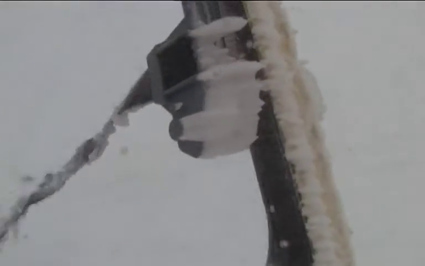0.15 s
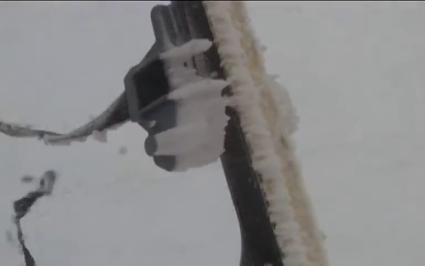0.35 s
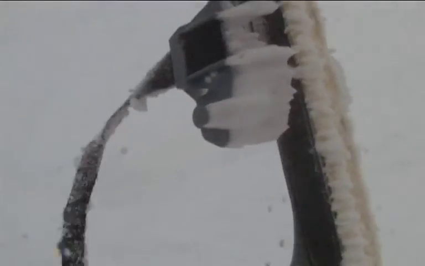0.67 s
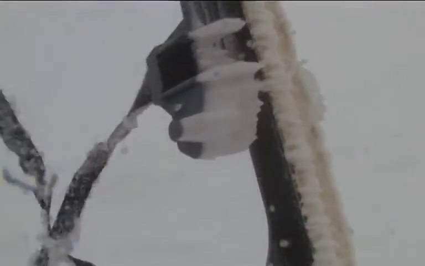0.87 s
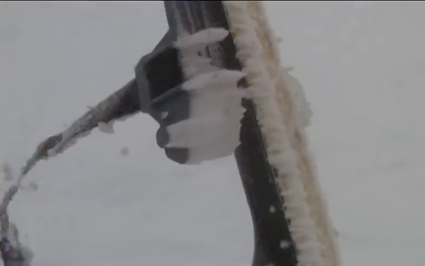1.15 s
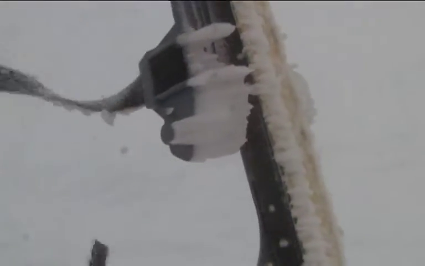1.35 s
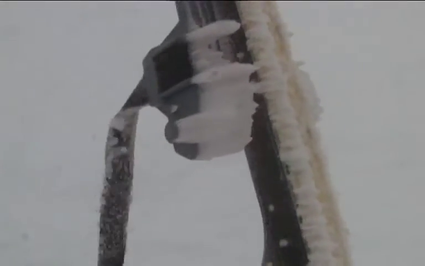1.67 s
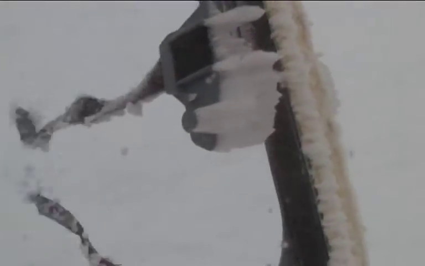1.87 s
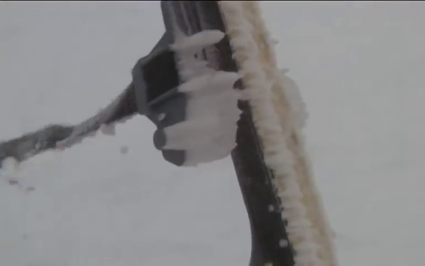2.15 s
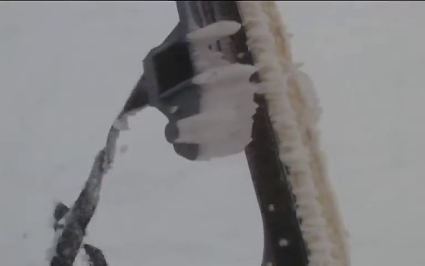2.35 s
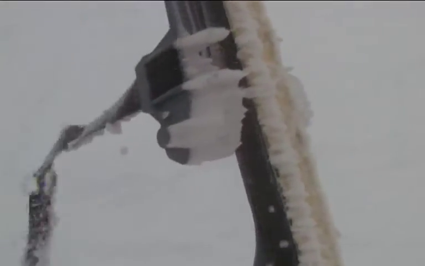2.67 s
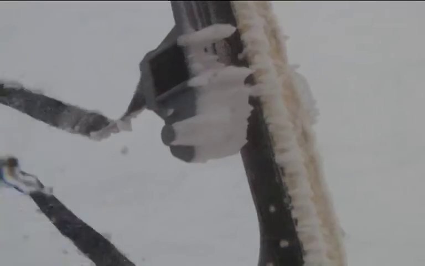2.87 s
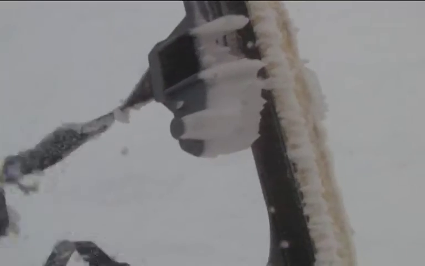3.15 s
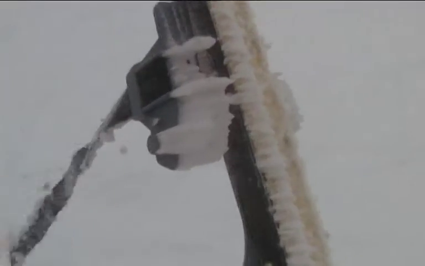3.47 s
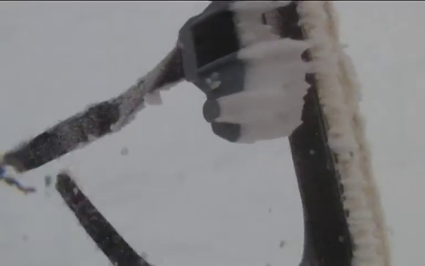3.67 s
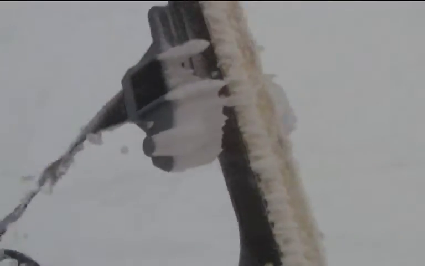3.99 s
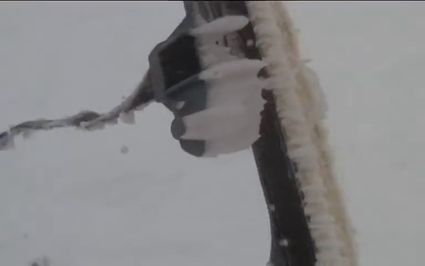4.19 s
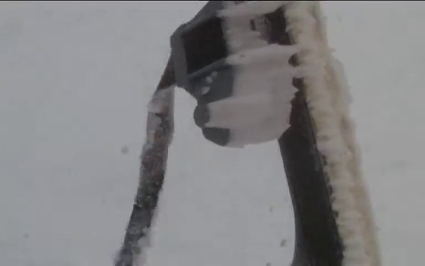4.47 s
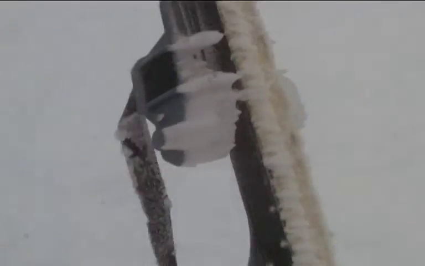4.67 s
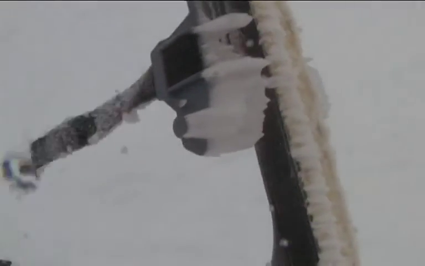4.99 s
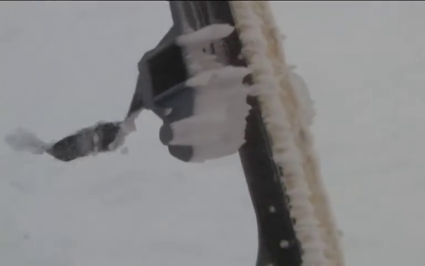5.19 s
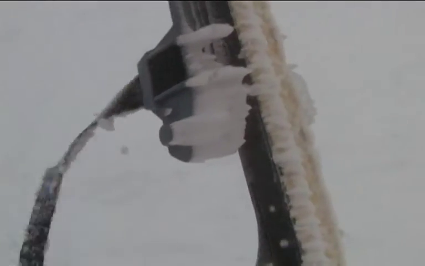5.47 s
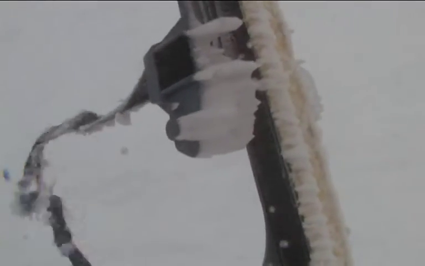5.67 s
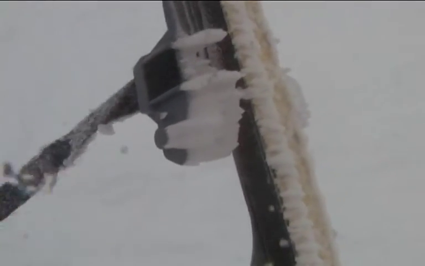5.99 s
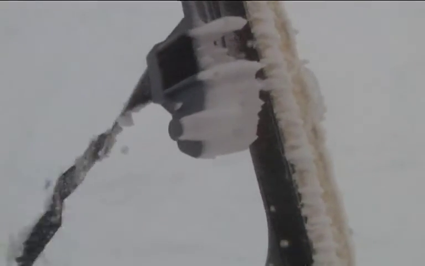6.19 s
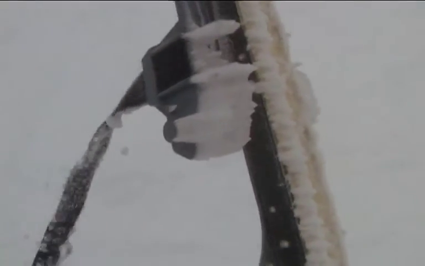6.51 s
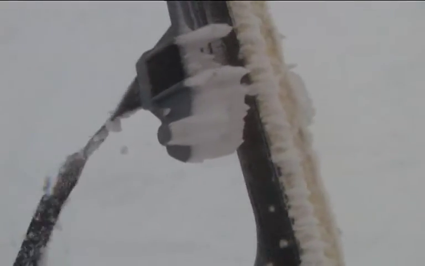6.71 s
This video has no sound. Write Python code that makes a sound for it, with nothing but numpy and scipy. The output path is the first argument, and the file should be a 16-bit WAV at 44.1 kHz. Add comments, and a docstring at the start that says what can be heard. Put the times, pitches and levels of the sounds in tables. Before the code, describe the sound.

Close, overloaded-sounding wind noise in open snowy air, with no echo. Deep buffeting and torn roaring continue throughout, broken by very short lulls and abrupt gusts. Fine snow hisses faintly, brightening with the gusts, and a thin airy high whistle barely shows. Small hard ice clicks cluster in the first second; later ones are sparse and nearly buried.

```python
"""A blizzard blows across a camera beside an iced-up mast, in deep rumble, ragged roar and hissing snow.
In the first second ice grains tick against the housing, and the level ducks briefly under the loudest tick.
Gusts and lulls move rumble, roar and snow (all shaped noise) together throughout; later ticks are few and faint.
A narrow gap sings all along as a thin band of noise, swelling early on and again past the third second.
The strongest gust lands shortly after the sixth second."""
import sys
import numpy as np
from scipy.fft import rfft, irfft, next_fast_len
from scipy.io import wavfile
from scipy.ndimage import uniform_filter1d, map_coordinates

SR = 44100
rng = np.random.default_rng(int(sys.argv[2]) if len(sys.argv) > 2 else 0)


def wrap_up_sound(samples):
    """Save the sound to the file named by the first command line argument, as 16-bit audio."""
    columns = np.atleast_2d(samples).T
    # keep every value between -1 and 1, then stretch to whole-number steps
    tamed = np.clip(columns, -1, 1)
    steps = np.round(tamed * 32767).astype(np.int16)
    wavfile.write(sys.argv[1], SR, steps)


N = 302085  # length in samples


def amp(db):
    """Decibels to gain."""
    return 10 ** (np.asarray(db) / 20)


def unit(x):
    """Scale to rms 1."""
    return x / np.sqrt(np.mean(x ** 2) + 1e-20)


def wobble(rate):
    """A smooth random curve through normal random knots, rate of them a second."""
    knots = rng.standard_normal(int(N * rate / SR) + 4)
    return map_coordinates(knots, [np.arange(N) * rate / SR])


def swells(table):
    """Sum of bell curves: each peaks at its level and is its length wide at half that level."""
    t = np.arange(N) / SR
    return sum(db * .5 ** ((2 * (t - middle) / length) ** 2) for middle, length, db in table)


def filtered(x, response):
    """Filter x by a gain given as a function of frequency."""
    m = next_fast_len(N + 8192)  # padded so the ends do not wrap round
    return irfft(rfft(x, m) * response(np.fft.rfftfreq(m, 1 / SR)), m)[:N]


def treble(x, corner_hz):
    """The part of x above a smooth corner, where the gain is one half."""
    return filtered(x, lambda hz: hz ** 4 / (hz ** 4 + corner_hz ** 4))


def coloured(x, spectrum):
    """Shape x by spectrum points joined on a log frequency axis, at rms 1."""
    f, db = np.transpose(spectrum)
    return unit(filtered(x, lambda hz: amp(np.interp(np.log(hz + 1), np.log(f), db))))


def turbulence(swirl_db):
    """White noise whose strength follows the swirling air."""
    return amp(swirl_db) * rng.standard_normal(N)


WHISTLE_DB = -58  # rms level between swells
# moments when the wind meets the gap squarely: middle t/s, length t/s, swell level/dB
WHISTLE_SWELLS = [(.17, .04, 7), (3.395, .08, 16), (3.834, .015, 13), (5.03, .04, 10)]


def whistle(centre_hz=5300, width_hz=360):
    """Air crossing a narrow gap sings as a faint band of noise; now and then it swells."""
    band = filtered(rng.standard_normal(N), lambda hz: np.exp(-.5 * ((hz - centre_hz) / width_hz) ** 2))
    return amp(WHISTLE_DB + swells(WHISTLE_SWELLS)) * unit(band)


HISS_DB, HISS_GROWTH = -42, 0.48  # level at zero drift; dB of hiss per dB of drift
SNOW_INERTIA_S = 0.035  # time over which the snow evens out the drive
# spectrum of the streaming snow: f/Hz, level/dB
SNOW_SPECTRUM = [(500, -24), (2000, 3.5), (3000, 0.5), (3850, 2.5), (4850, -5), (5900, -5.5), (7200, -2.5),
                 (8500, -6.5), (9300, -8.5), (10600, -8.5), (11700, -14), (12500, -14.5), (13700, -17.5),
                 (15800, -21)]
# spectrum of a coarse grain's tiny tick: f/Hz, level/dB
GRAIN_SPECTRUM = [(3000, -30), (6500, -9), (8500, 11), (11000, -6), (13500, -5), (15800, -10)]
# thicker puffs of snow: middle t/s, length t/s, extra drift level/dB
FLURRIES = [(.3, 0.32, 2), (3.388, 0.019, 5), (3.428, .018, 3.5), (4.17, 0.035, 5), (6.285, .02, 1)]


def snow(drive_db, flutter, eddies, grains_per_s=55, grain_db=-18.0,
         fizz_hz=7500, fizz_growth=0.45, fizz_flutter_db=2.5):
    """Fine snow, too heavy to follow the briefest changes, hisses and fizzes brighter in gusts, amid coarser grains."""
    drift_db = uniform_filter1d(drive_db, int(SNOW_INERTIA_S * SR)) + swells(FLURRIES)
    hiss = coloured(turbulence(0.88 * flutter + 1.18 * eddies), SNOW_SPECTRUM)
    fizz = treble(hiss, fizz_hz)
    sparkle = unit(amp(fizz_growth * drift_db + fizz_flutter_db * wobble(220)))
    stream = hiss - fizz + fizz * sparkle
    # grains arrive at random and at a steady average rate, each with its own strength
    impacts = (rng.random(N) < grains_per_s / SR) * rng.standard_normal(N)
    grains = coloured(impacts, GRAIN_SPECTRUM)
    return amp(HISS_DB + HISS_GROWTH * drift_db) * stream + amp(HISS_DB + grain_db) * grains


# the housing's ringing modes: f/Hz, level/dB, time to fall 60 dB t/s
HOUSING_MODES = [(2000, -3.5, .0064), (2740, -7.4, .0037), (3580, -1.1, .0033), (4080, -4.8, .0045),
                 (6430, -14, .007), (8200, -2.5, .0065), (8650, -4, .0063), (10100, -8, .0055),
                 (10700, -10, .0055), (12400, -11, .0055), (13100, -16, .005), (14500, -20, .0044)]
# ice grains on the housing: t/s, peak level/dB before the final filter, low-mode level/dB, pitch ratio
TICKS = [(.0718, -18, -10, 1.1), (.0908, -26, -14, 1.05), (0.511, -17, 1, 1), (.5679, -15, 1, 1),
         (.6314, -27, -8, 1.1), (.7967, -16, -1, 1.2), (0.8453, -7.5, -6, .98), (0.9673, 3, -1, 1.01),
         (3.0192, -21, -10, 1.05), (3.5221, -27, -8, 1), (4.179, -25, -8, 1), (5.945, -28, -14, 1.03),
         (6.076, -27, -12, 1)]


def ice_ticks(knock_below_hz=5000, thin_hz=1600, soft_hz=15300):
    """Each grain rings the housing for milliseconds, with its own pitch and its own share of low modes."""
    out, t = np.zeros(N + SR), np.arange(SR // 20) / SR
    for s, db, knock_db, pitch in TICKS:
        ring = np.zeros(len(t))
        for hz, level, t60 in HOUSING_MODES:
            start_db = level + knock_db * (hz < knock_below_hz) + rng.normal(0, 1)
            ring += amp(start_db - 60 * t / t60) * np.sin(2 * np.pi * pitch * hz * t)
        out[round(s * SR):][:len(t)] += amp(db) * ring / np.abs(ring).max()

    def radiation(hz):
        """The small housing gives off no bass, and blunt grains leave the very top dull."""
        return hz ** 4 / np.hypot(hz ** 4, thin_hz ** 4) / (1 + (hz / soft_hz) ** 16)

    return filtered(out[:N], radiation)


# chance swings of the wind: rate in knots/s, depth level/dB
SWAY = [(7, 0.1), (24, 0.55)]


def sway():
    """Small random swings of the wind, in dB."""
    return sum(db * wobble(rate) for rate, db in SWAY)


# brief dips of level: lulls in the wind, and at 0.967 s the gain ducking under the loudest tick:
# middle t/s, length t/s, depth level/dB
DIPS = [(0.142, 0.042, 4.5), (0.573, 0.029, 2.5), (0.67, .02, 3), (0.807, 0.037, 5.5), (0.967, 0.028, 10.5),
        (1.07, 0.021, 10.5), (1.27, 0.031, 3), (1.406, .035, 3), (1.62, 0.15, 4), (2.102, 0.14, 4.5),
        (2.472, 0.036, 11), (2.655, 0.033, 5.5), (3.182, 0.029, 4.5), (3.519, 0.062, 5.5),
        (3.625, 0.021, 17), (3.853, 0.027, 4), (4.011, 0.042, 6.5), (4.243, 0.051, 3.5), (4.315, 0.026, 3),
        (4.993, 0.046, 6.5), (5.433, .04, 3), (5.512, 0.061, 3), (5.988, 0.12, 2), (6.135, 0.021, 0),
        (6.792, 0.059, 5.5)]


def dips():
    """Drop of the drive in dB, set by the table: it sinks and returns smoothly."""
    return swells(DIPS)


GUST_EBB_S = 0.014  # time for a gust's dB rise to fall to about a third
# gusts out of the steady wind: start t/s, rise t/s, hold t/s, strength level/dB, extra rumble level/dB
GUSTS = [(0.21, 0.007, 0.014, 7, 4.5), (.23, 0.018, 0.21, 3, -3), (0.282, .01, .02, 4, -1),
         (0.505, 0.0063, 0.016, 6.5, 0), (0.61, .006, 0.058, 0.5, 4.5), (0.683, .008, 0.065, 1.5, -1),
         (0.853, .006, 0.087, 2, 0), (0.987, 0.0055, 0.017, 3, 0), (1.087, 0.0065, 0.029, 5.5, -1),
         (1.16, 0.011, 0.023, 2.5, 3), (1.289, 0.006, 0.032, 6.5, -0.5), (1.42, .012, 0.069, 3, 0.5),
         (1.5, 0.016, 0.025, 7, -2.5), (1.775, .012, .03, 3, -0.5), (1.846, .015, 0.14, 2.5, 2.5),
         (1.994, .01, 0.033, 5, 0.5), (2.191, 0.0097, 0.074, 3.5, 2), (2.298, 0.0072, 0.012, 8.5, -3),
         (2.338, .01, 0.11, 3, -4.5), (2.518, .006, 0.0091, 5.5, -7), (2.574, .006, 0.041, 3, -9),
         (2.734, 0.01, 0.015, 4, 1.5), (2.866, 0.036, 0.053, 3, 0), (3.045, .01, 0.1, 2, 1.5),
         (3.236, .015, 0.042, 5.5, -1.5), (3.372, .012, 0.037, 5, -3), (3.59, .008, .025, 5, 8.5),
         (3.66, 0.029, 0.093, 5.5, 0.5), (3.737, .004, 0.011, 6, -6), (3.945, 0.013, 0.063, 1.8, 3.5),
         (4.1, .02, 0.076, 2.5, 0), (4.324, 0.011, 0.04, 4, 4), (4.43, 0.015, .12, 3, -1.5),
         (4.636, 0.0092, 0.022, 4, 4.5), (4.73, .006, 0.17, 3, -1.5), (5.145, 0.027, 0.071, 8, -0.5),
         (5.277, 0.017, 0.094, 2.5, -4.5), (5.458, 0.0062, .015, 5, 4), (5.566, .008, 0.015, 6, -7),
         (5.63, 0.0053, 0.016, 4, 1.5), (5.737, .012, 0.021, 3, 3.5), (5.795, .006, 0.014, 4.5, 3),
         (6.07, 0.0055, 0.016, 3, 6), (6.271, 0.011, 0.021, 10.5, 2.5), (6.318, 0.01, 0.03, 5.5, -2),
         (6.378, .013, 0.05, 5, -3.5), (6.488, .012, 0.024, 3, -4), (6.537, 0.017, 0.039, 3.5, -3.5),
         (6.822, 0.0085, .04, 4, 7)]


def gusts():
    """Rise of the wind and extra rise of the rumble, in dB: each gust hits fast, holds and ebbs."""
    t = np.arange(N) / SR
    start, rise, hold, strength_db, rumble_db = np.transpose(GUSTS)[:, :, None]
    attack = np.clip((t - start) / rise, 0, 1)
    ebb = np.exp(-np.maximum(t - start - rise - hold, 0) / GUST_EBB_S)
    shape = attack * ebb
    return (strength_db * shape).sum(0), (rumble_db * shape).sum(0)


RUMBLE_DB, ROAR_DB = -17, -17.5  # levels in the steady wind
RUMBLE_GROWTH, BODY_GROWTH, EDGE_GROWTH = 0.38, 0.66, 0.9  # dB of each layer per dB of drive
# spectrum of the deep rumble: f/Hz, level/dB
RUMBLE_SPECTRUM = [(15, -36), (28, -13.5), (45, -8), (75, -1.5), (100, 0), (120, 1), (150, 0), (200, -6),
                   (300, -12.5), (600, -40), (1500, -84)]
# spectrum of the ragged roar: f/Hz, level/dB
ROAR_SPECTRUM = [(60, -19), (150, -5), (260, 1.5), (370, 0), (500, -2.5), (700, -6.5), (1000, -12.5),
                 (1500, -20), (2000, -27), (3000, -41), (5000, -75), (12000, -82)]


def buffeting(drive_db, shove_db, flutter, eddies, edge_hz=900, edge_db=0.15, lumpy_db=0.03, lumps_per_s=16):
    """Large eddies shove the diaphragm and rumble; small ones tear at the port and roar."""
    pressure = amp(RUMBLE_GROWTH * drive_db + shove_db + lumpy_db * wobble(lumps_per_s))
    rumble = pressure * coloured(turbulence(.5 * flutter), RUMBLE_SPECTRUM)
    roar = coloured(turbulence(flutter + 1.55 * eddies), ROAR_SPECTRUM)
    # faster air breaks into finer eddies, so the top of the roar swings furthest
    edge = treble(roar, edge_hz)
    body = (roar - edge) * amp(BODY_GROWTH * drive_db)
    edge = edge * amp(edge_db * (flutter + eddies) + EDGE_GROWTH * drive_db)
    return amp(RUMBLE_DB) * rumble + amp(ROAR_DB) * (body + edge)


FLUTTER_PER_S, EDDIES_PER_S = 45, 260  # knots/s of the larger and the smaller swirls
RUMBLE_DIP = 0.67  # extra dB the rumble loses per dB of dip


def scene():
    """One drive of gusts, dips and sway moves rumble, roar and snow together; the rumble dips further."""
    gust_db, shove_db = gusts()
    dip_db = dips()
    drive_db = gust_db - dip_db + sway()
    flutter, eddies = wobble(FLUTTER_PER_S), wobble(EDDIES_PER_S)
    background = whistle() + snow(drive_db, flutter, eddies) + ice_ticks()
    wind = buffeting(drive_db, shove_db - RUMBLE_DIP * dip_db, flutter, eddies)
    return (background + wind)[None]


TOP_HZ = 15800  # band limit


def record(dry):
    """Peaks round off towards full scale, then everything from the band limit up is cut."""
    held = dry[0] / (1 + np.abs(dry[0]) ** 8) ** (1 / 8)
    return filtered(held, lambda hz: hz < TOP_HZ)[None]


dry = scene()
out = record(dry)
wrap_up_sound(out)
```